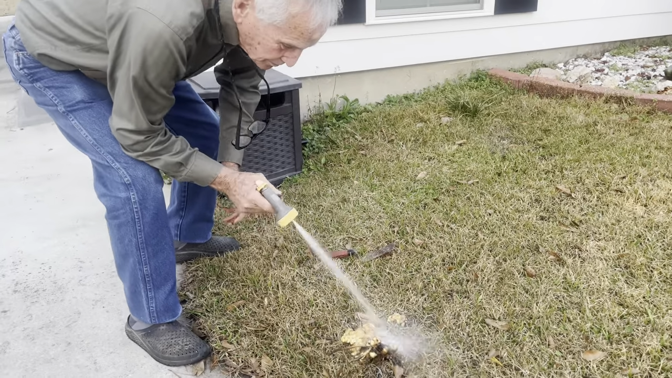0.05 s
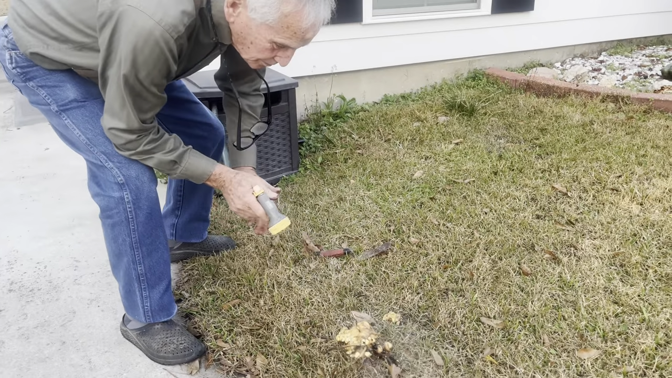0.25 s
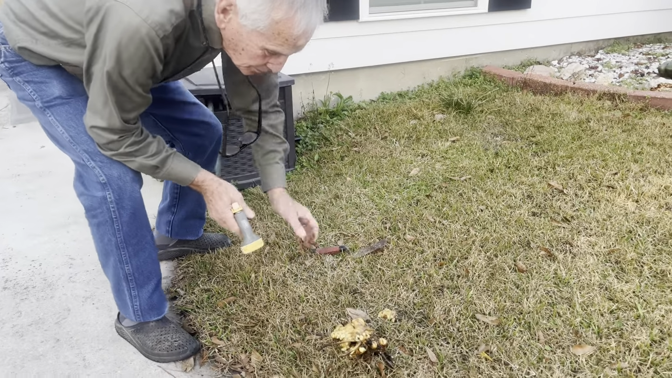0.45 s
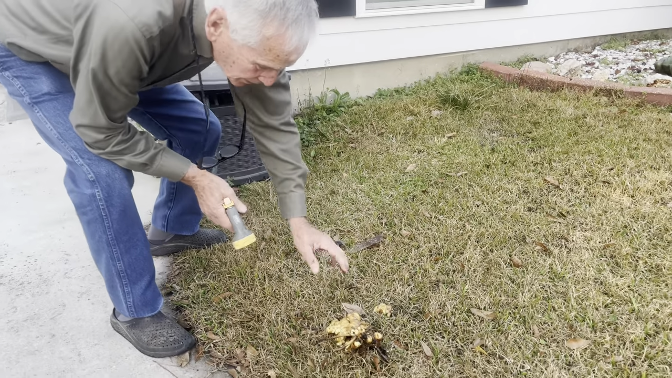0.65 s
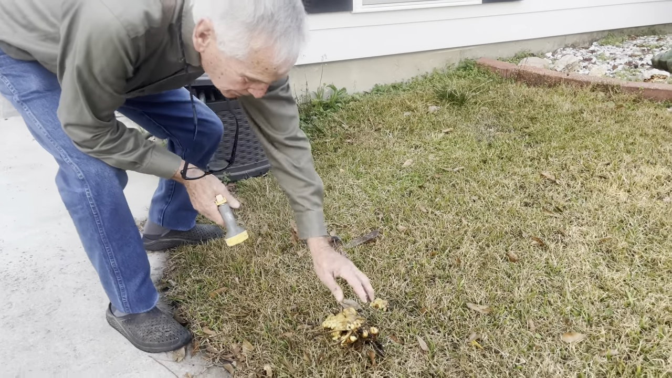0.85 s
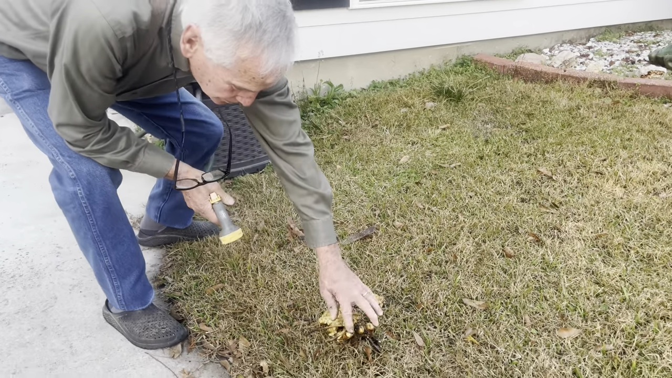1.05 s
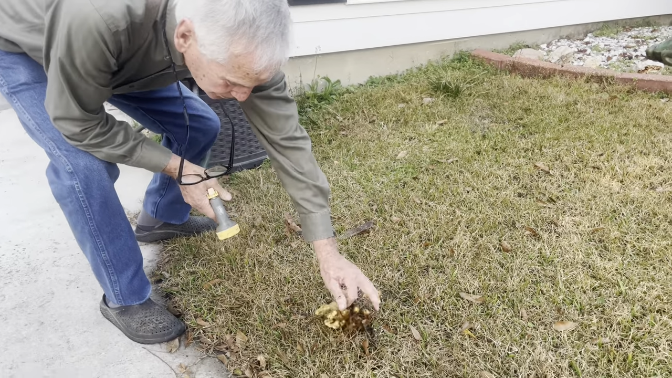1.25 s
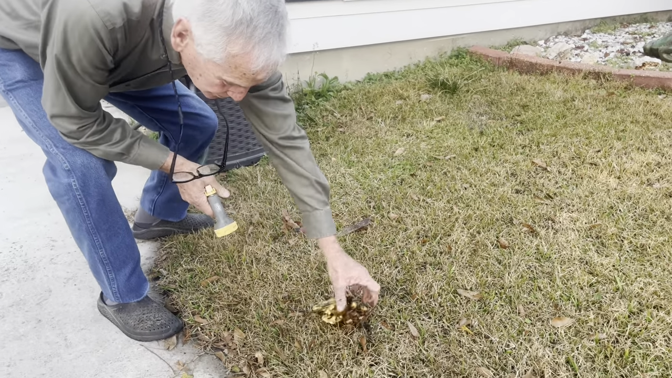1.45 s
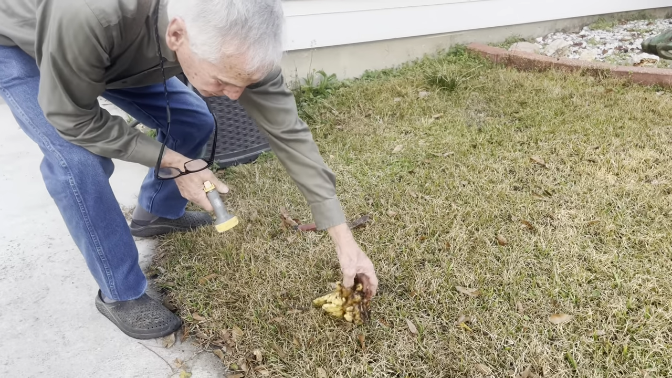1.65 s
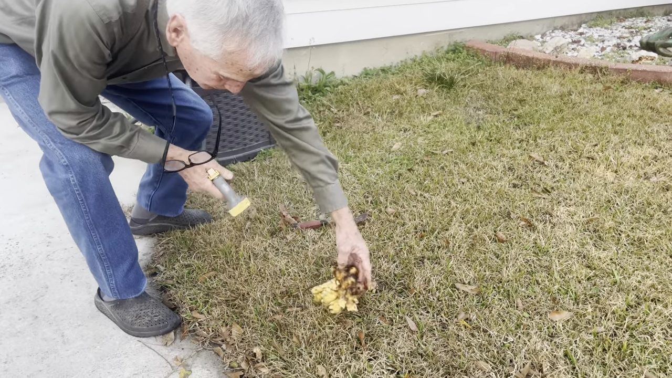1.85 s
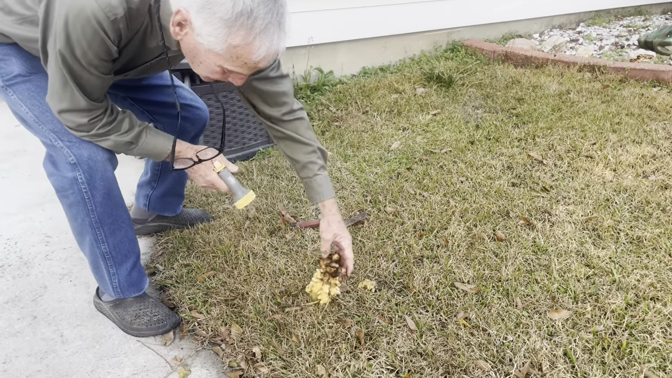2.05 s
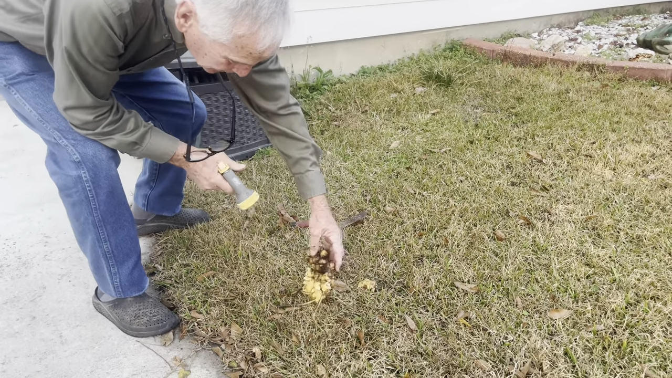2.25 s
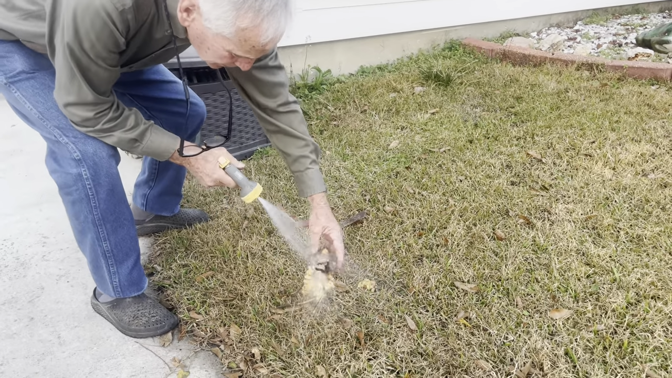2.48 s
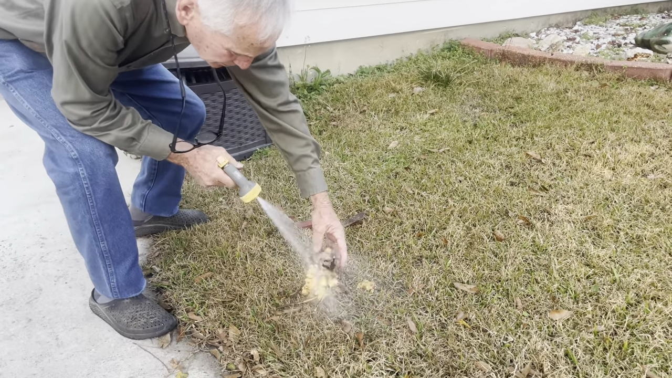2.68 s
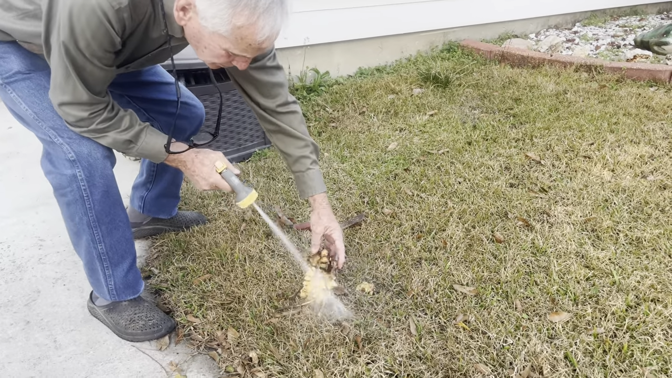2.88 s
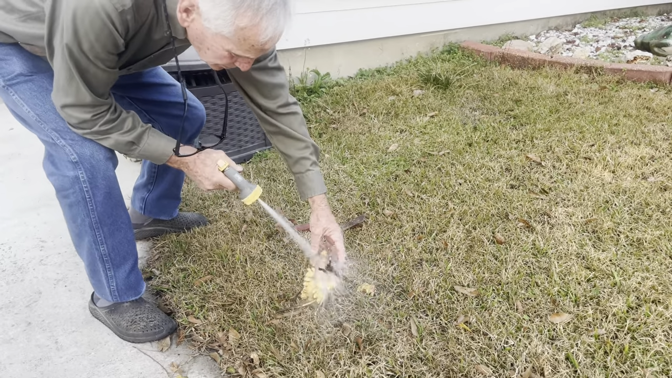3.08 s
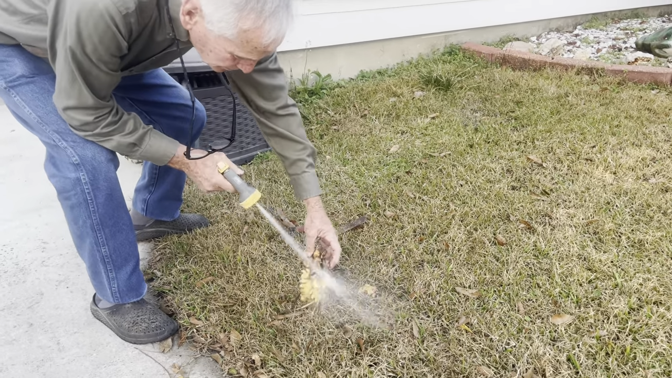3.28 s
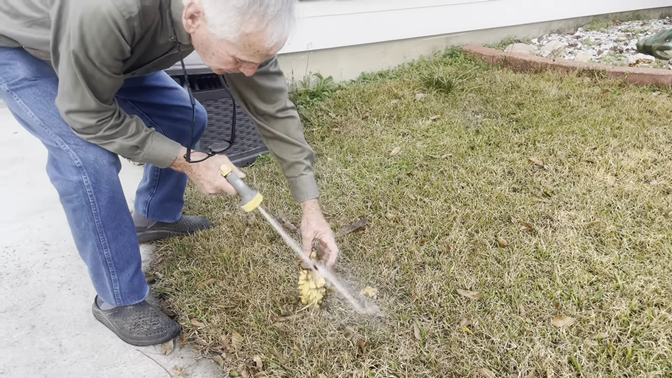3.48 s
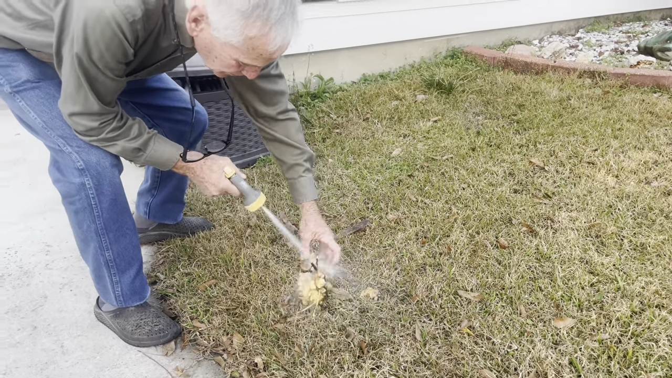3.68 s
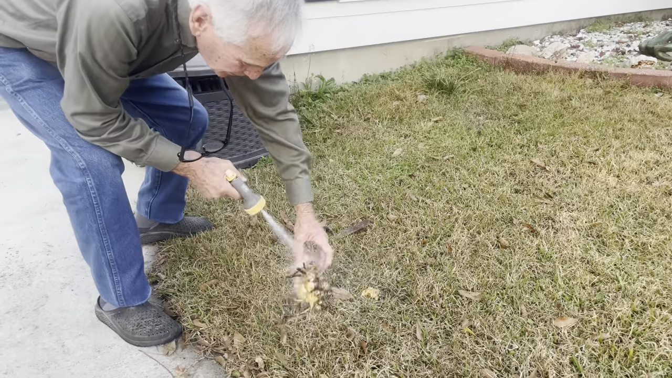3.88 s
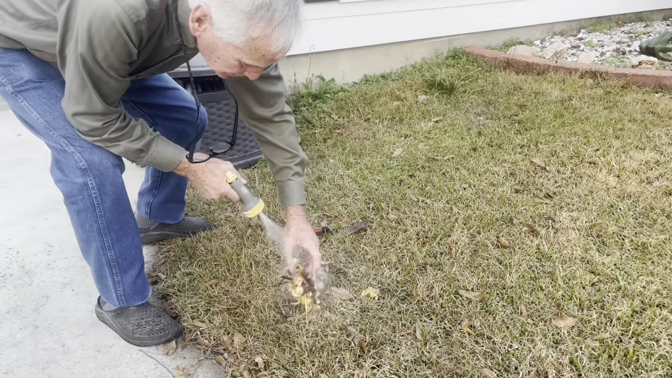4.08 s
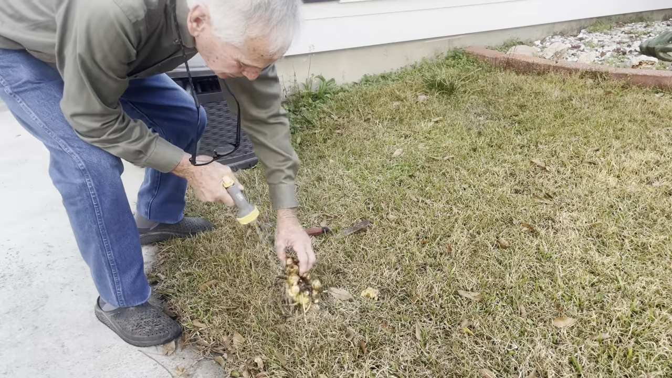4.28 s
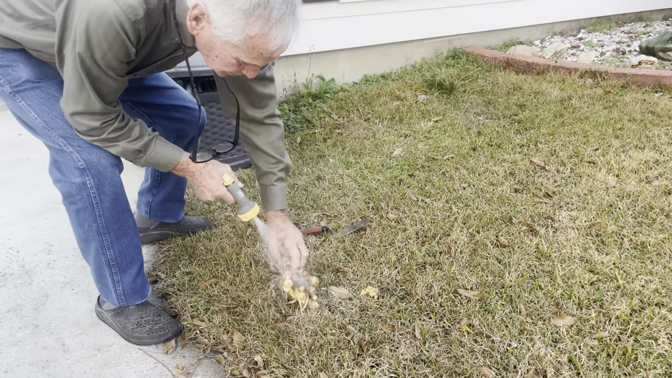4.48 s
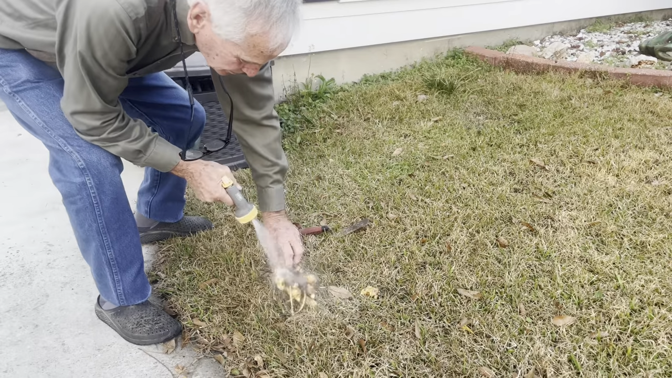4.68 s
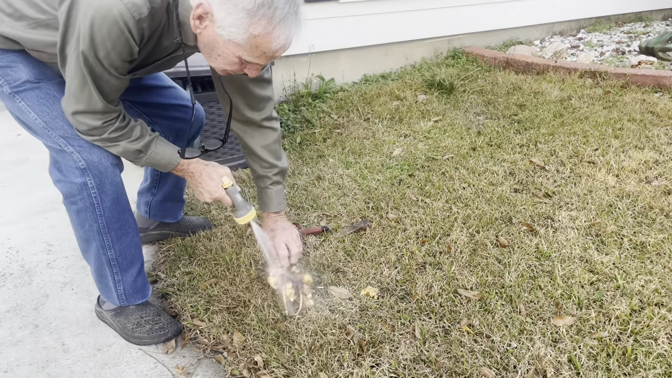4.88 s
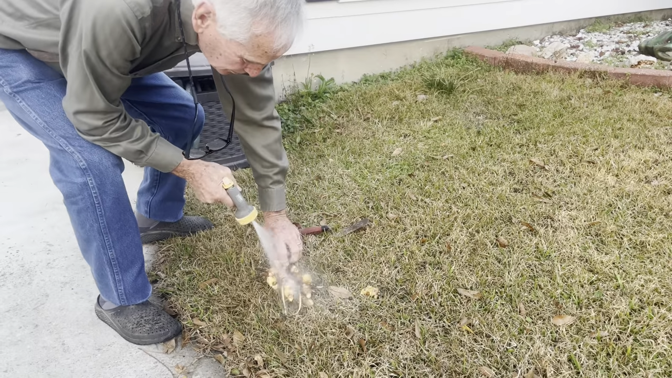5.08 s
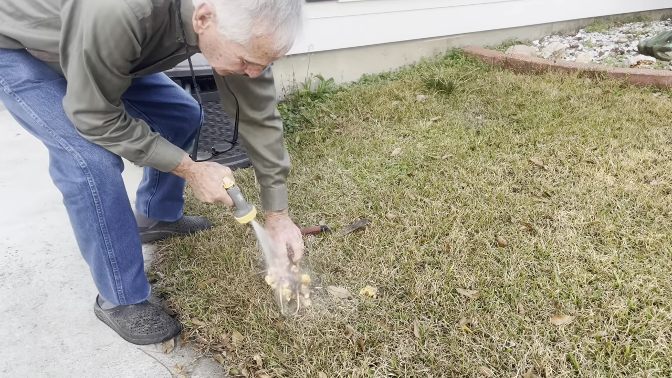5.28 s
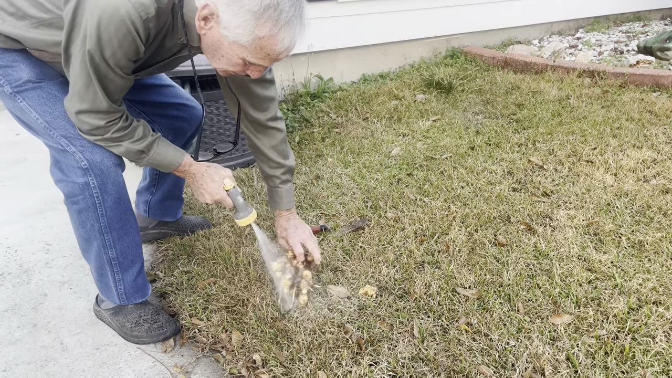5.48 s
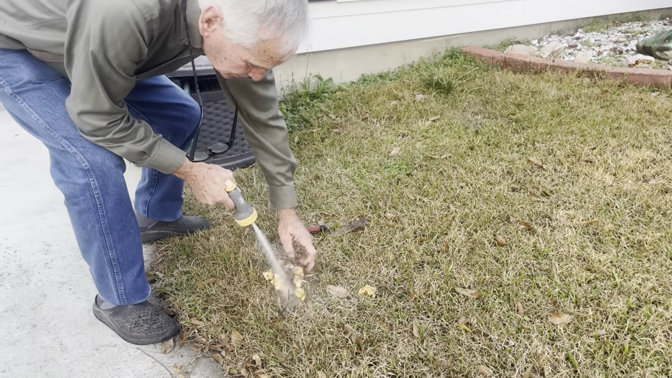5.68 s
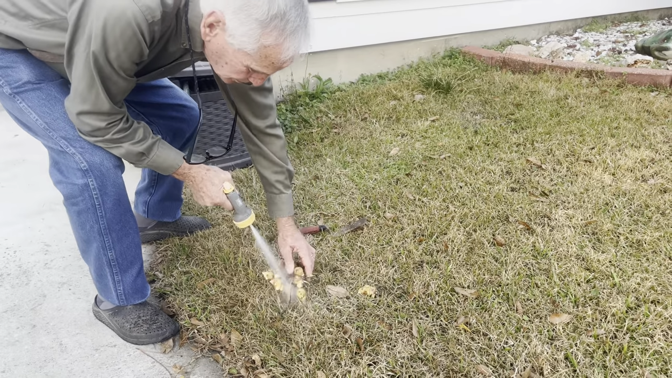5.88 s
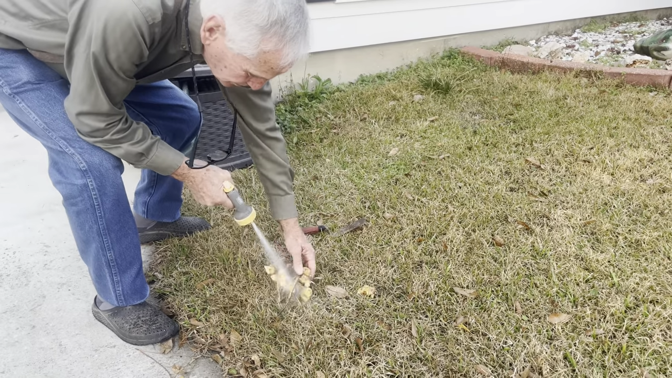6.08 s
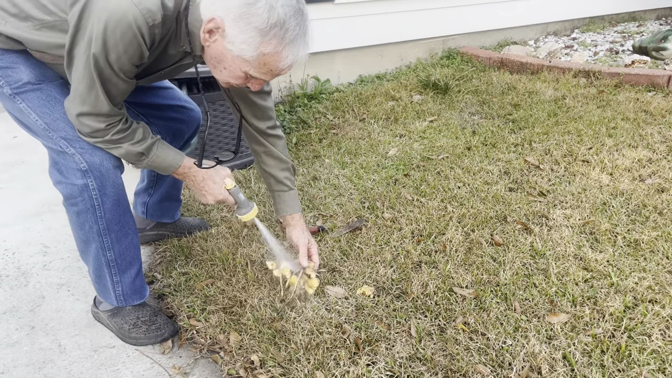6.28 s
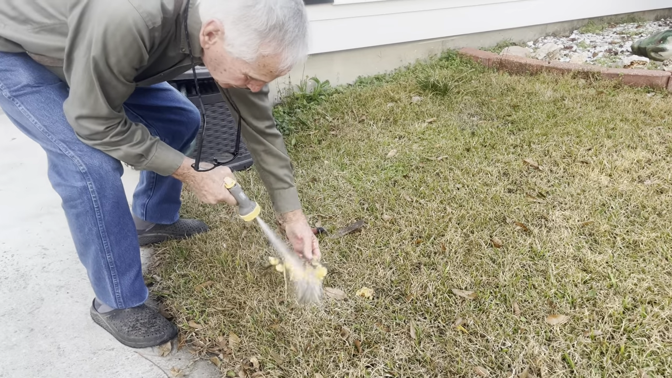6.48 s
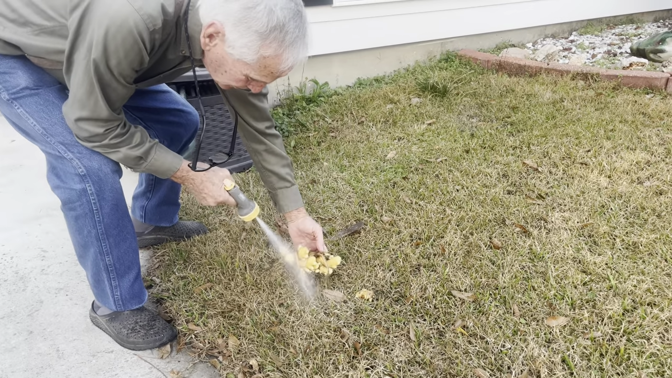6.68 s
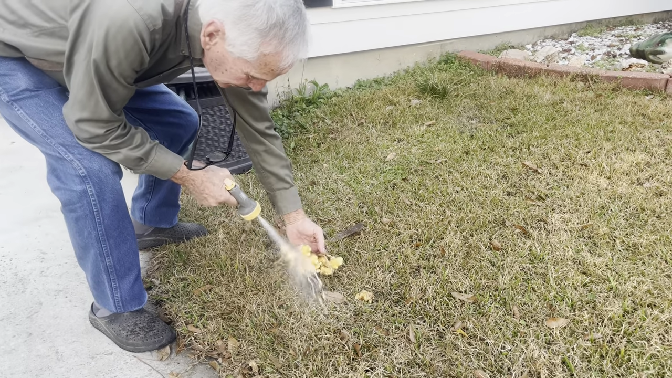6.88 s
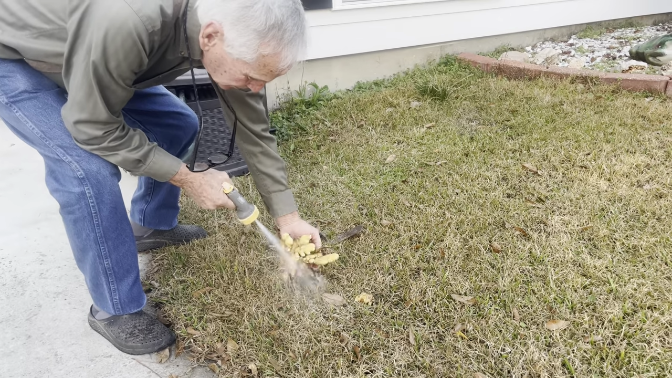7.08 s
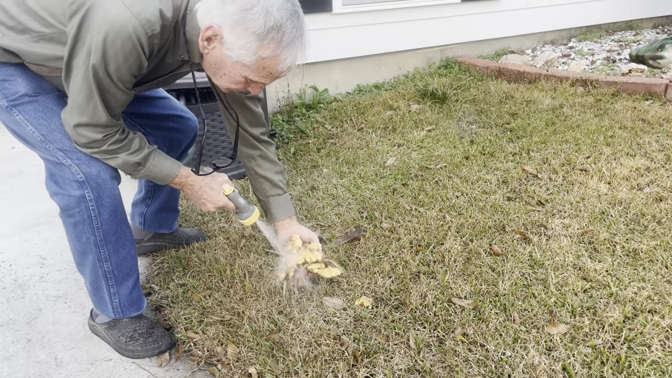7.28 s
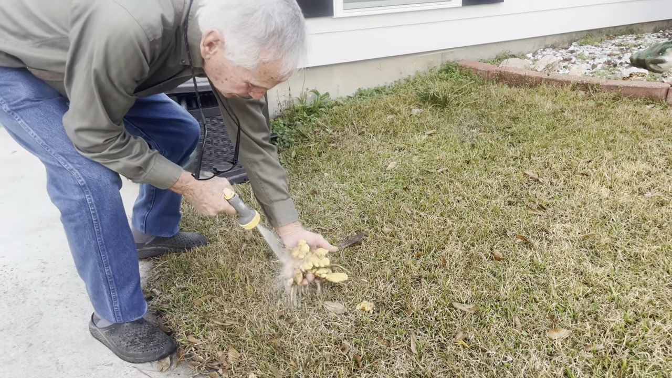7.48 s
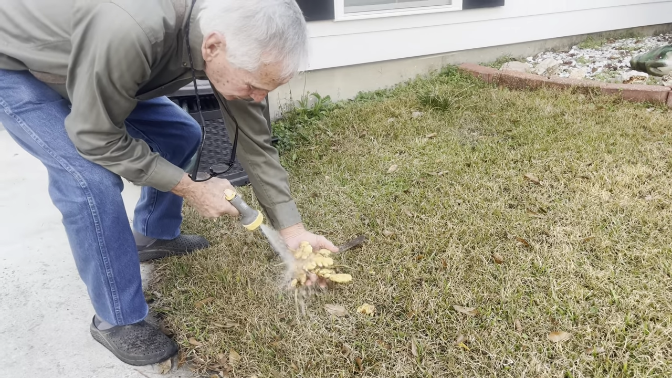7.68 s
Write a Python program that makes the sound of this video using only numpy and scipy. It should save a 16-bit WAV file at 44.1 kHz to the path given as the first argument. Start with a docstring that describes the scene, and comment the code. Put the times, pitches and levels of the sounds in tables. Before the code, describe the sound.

Outdoors on a lawn, a phone microphone a couple of metres off picks up a short splash of hose water over a low, distant traffic rumble. In the pause come faint insect ticks and light crackles of a hand in the grass. Then the nozzle opens again with a sputtering hiss, eases off once and resumes with wetter smacks on roots and hand. Low knocks bump the microphone stand now and then.

```python
"""Garden nozzle on roots

A nozzle opens in three spells onto roots on a lawn, a couple of metres from a phone with two ports.
The jet hisses, drops splatter on roots and hand, near surfaces colour both. Distant traffic rumbles,
an insect ticks on the left, a hand rustles in the grass and knocks run through the phone's stand."""
import sys
import numpy as np
from scipy import signal
from scipy.fft import rfft, irfft, next_fast_len
from scipy.io import wavfile
from scipy.ndimage import uniform_filter1d

SR = 44100
rng = np.random.default_rng(int(sys.argv[2]) if len(sys.argv) > 2 else 0)


def store_pcm(level_fs):
    """Save levels as 16-bit WAV."""
    pcm = np.round(np.clip(level_fs, -1, 1) * 32767).astype(np.int16)
    wavfile.write(sys.argv[1], SR, np.atleast_2d(pcm).T)


N = 341334
FFT_SIZE = 64 * next_fast_len(N // 64 + 128)
FREQ_HZ = np.maximum(np.arange(FFT_SIZE // 2 + 1) * SR / FFT_SIZE, 1)
TIME_S = np.arange(N) / SR

# Spraying, one table a spell: time_s, hiss_db, splatter_db
SPELLS = [
    [(0.0, -38.5, -32.5), (0.08, -36.5, -31), (0.1, -31.5, -21), (0.15, -32, -24), (0.22, -37, -35),
     (0.266, -38, -31), (0.304, -58, -64), (0.36, -72, -62)],
    [(2.3, -86, -60), (2.325, -61, -51), (2.418, -43, -35), (2.422, -28.5, -27.5), (2.46, -31, -30),
     (2.76, -33, -31.5), (2.96, -28.5, -29.5), (3.02, -30.5, -32), (3.15, -28, -30), (3.29, -33.5, -32.5),
     (3.44, -30.5, -28), (3.54, -33, -30), (3.62, -27, -30.5), (3.77, -28.5, -31), (4.03, -34.5, -31),
     (4.13, -44.5, -40.5), (4.23, -48.5, -40), (4.3, -59, -43), (4.43, -58, -45)],
    [(4.45, -53, -43), (4.465, -41.5, -39), (4.73, -36.5, -34), (4.785, -32, -31), (4.9, -32.5, -26),
     (4.94, -32.5, -30.5), (5.14, -33, -29.5), (5.2, -30, -23.5), (5.25, -32, -30), (5.4, -32, -30),
     (5.46, -30, -21), (5.68, -33.5, -25), (5.72, -32, -25), (5.98, -34, -25), (6.04, -31.5, -29),
     (6.2, -34, -30.5), (6.5, -34, -31.5), (6.61, -34, -25), (6.68, -32, -31.5), (6.9, -31.5, -31),
     (7.04, -33, -30), (7.14, -34, -30.5), (7.17, -31.5, -28.5), (7.33, -33.5, -29.5), (7.46, -32.5, -34.5),
     (7.58, -37, -35), (7.74, -37, -36.5)],
]
# Bands favoured by near surfaces and phone body; the jet lands elsewhere in each spell:
# centre_hz, width_hz, spell0_db, spell1_db, spell2_db
SURFACE_BANDS = [(450, 720, -9, -13.5, -17.5), (823, 53, -8, -5, -5), (1108, 226, 2.5, 2, 2),
                 (1785, 750, 5.5, 5.5, 4.5), (2248, 420, 3.5, 1, 3), (3070, 290, -23, -4, -0.5),
                 (3743, 610, 10.5, 8.5, 7), (4480, 400, 6, -8, -4.5), (4950, 265, 6.5, 4, 4.5),
                 (5600, 230, -1, 2, 4), (6105, 350, 0.5, 4.5, 4.5), (6700, 370, -0.5, 0.5, 3),
                 (7440, 590, -9, -6.5, -9), (8430, 600, -11, -8.5, -11.5), (9320, 1000, -15.5, -10.5, -10),
                 (10300, 1140, -16, -10, -10), (11010, 670, -12, -12.5, -12), (13500, 1800, -36, -30, -30)]
# Left port, facing away from the jet: freq_hz, gain_db, lag_rad, coherence
LEFT_SHADE = [(640, 0, 1, .3), (1100, 0, .5, .75), (1550, -1, .2, .7), (1900, -1.5, .5, .9),
              (2240, -4.5, .4, .95), (2600, -7, 2.3, .6), (2930, 0, .2, .65), (3300, 6, .3, .6),
              (3650, 4.5, .5, .95), (3980, 0, 0, .9), (4300, 2, 2.4, .2), (4650, 3, 2.4, .5),
              (5050, 0, 2.2, .75), (5340, -1, 0, .3), (5700, -1, .5, .5), (6050, -1, .7, .9),
              (6400, 0, .8, .7), (6750, -1, .6, .9), (7060, -2, 0, .45), (7420, -1.5, -.8, .75),
              (7800, -3, -1, .4), (8050, -9, -3.6, .3), (8450, -7.5, -2.2, .7), (9100, -13, -1, .4),
              (9500, -16, -2, .6), (10200, -20, 1, .45), (11200, -31, 3, .15), (12100, -18, 3, .1),
              (12600, 6, 3, .1)]
# Fine drops brighten, brief splashes and one long late swell: centre_s, boost_db, width_s
FINE_SWELLS = [(3.564, 2, 0.026), (3.97, 8, 0.016), (4.844, 6, 0.036), (6.44, 9, 0.037), (6.65, 4.5, 0.84)]
# Traffic bass spectrum: freq_hz, relative_db
BASS_SPECTRUM = [(13, -52), (22, -22), (34, -24), (52, -1.5), (87, -1), (117, -6.5), (144, -1), (177, -11),
                 (400, -35), (520, -65), (880, -120)]
# Traffic bass swell: time_s, level_db
BASS_SWELL = [(0.0, -27.5), (2.2, -27), (2.7, -27.5), (3.2, -28), (5.3, -28), (6.8, -29), (7.74, -29)]
# Tyre hiss spectrum: freq_hz, relative_db
TYRE_SPECTRUM = [(180, -37), (300, -10.5), (441, -15), (793, -4.5), (1020, -1.5), (1200, -5.5),
                 (1400, -4.5), (2030, -15), (2200, -17.5), (2410, -23.5), (2950, -29.5), (3450, -27),
                 (3900, -34), (4470, -36.5), (6780, -31.5), (12000, -63.5), (15600, -77), (22000, -120)]
# Tyre hiss swell: time_s, gain_db
TYRE_SWELL = [(0.0, 3), (0.6, 1.5), (1.4, 0.5), (2.3, 0), (4.3, -1.5), (6.0, 1), (7.74, -1)]
# Traffic across the ports: freq_hz, left_minus_right_db, coherence
TRAFFIC_SIDES = [(62.4, -0.7, 0.98), (204, 6.5, 0.88), (557, -3, 0), (1340, 1.5, 0.71), (2180, 1.5, 0.16),
                 (5850, 6, 0), (8100, 2.5, 0.4), (10800, -25, 0.4)]
# Gulps hitting hand and roots: start_s, strength_db
SMACKS = [(0.094, -10), (0.125, -8), (0.144, -12), (4.8589, -15), (4.908, -13), (5.166, -23), (5.188, -12),
          (5.201, -15), (5.211, -16), (5.223, -12), (5.4243, -9), (5.441, -7), (5.4618, -12), (5.475, -14),
          (5.499, -8), (5.509, -6), (5.514, -5.5), (5.526, -8), (5.532, -6), (5.5647, -12), (5.5924, -7),
          (5.6, -13), (5.617, -9), (5.65, -13), (5.689, -12), (5.7087, -8), (5.718, -10), (5.755, -19),
          (5.7703, -15), (5.9234, -21), (6.0823, -16), (6.1694, -19), (6.2575, -15), (6.4053, -20),
          (6.5375, -16), (6.5819, -15), (6.6134, -11), (6.628, -18), (7.1152, -18), (7.1586, -19),
          (7.195, -15), (7.28, -17), (7.1759, -10)]
# Loudest grass crackles: start_s, strength_db, left_minus_right_db
CRACKLES = [(0.7537, -43, -5), (1.1682, -38, -1.5), (1.185, -28, 1), (1.2144, -45, 4), (1.2374, -41, 2.0),
            (1.294, -44, 0), (1.365, -47, 0), (1.508, -45, 0), (1.5224, -43, -3), (1.535, -43, 0),
            (1.5753, -42, 4), (1.6304, -40, 0.0), (1.652, -44, 0), (1.6734, -42, 5.5), (1.8003, -41, 0),
            (2.016, -43, 0), (2.135, -47, 0)]
# Hand strokes through grass: centre_s, width_s, strength_db, centre_hz, width_hz
BRUSHES = [(0.78, .04, -66, 7000, 6000), (1.24, .05, -49, 6000, 4000), (1.6, .13, -50, 2200, 400)]
# Knocks in the stand: crest_s, peak_db, fullest_age_s, log_spread, ripple_db, ripple_hz
KNOCKS = [(2.182, -17, .014, 0.4, -32, 490), (2.8737, -4.5, 0.01, 0.29, -22, 475),
          (3.587, -5.5, .013, 0.33, -28.5, 480), (4.1005, -20, 0.011, 0.29, -44, 500),
          (5.897, -15.5, 0.013, 0.32, -40, 503), (6.915, -3.5, 0.015, 0.44, -28, 520),
          (7.2864, -9.5, 0.022, 0.39, -26, 487), (7.323, -21, .011, 0.46, -32, 450),
          (7.386, -2.5, 0.014, 0.4, -23.5, 554)]
# Nozzle spits: start_s, strength_db
SPITS = [(2.4198, -5), (2.5292, -13), (2.6179, -14), (3.3114, -20), (3.5094, -10), (3.5937, -11.5),
         (3.966, -9), (4.122, -25), (4.206, -21), (4.221, -26), (4.275, -31), (4.458, -25.5), (4.475, -26),
         (4.486, -20), (4.7805, -12), (4.9482, -15), (5.238, -14), (5.3398, -14), (5.9429, -19),
         (6.0077, -19), (6.3949, -13), (7.125, -16), (7.3218, -15), (7.6675, -18)]

SLAP_HZ, SPLATTER_HZ, FINE_HZ, HISS_HZ, MIST_HZ = 284, 1380, 2750, 4250, 7900  # lower band edges
FULL_HISS_DB, FULL_SPLATTER_DB = -32, -30
TREBLE_BROADENING, BAND_STRETCH, SWAY_SHARE = (1.77, 1.06, 0.99), (1, 0.98, 0.97), (0, .4, 1)  # by spell


def undb(db):
    """dB to gain."""
    return 10 ** (np.asarray(db) / 20)


def unit(x):
    """Scale to rms 1."""
    return x / np.sqrt(np.mean(x ** 2))


def noise(samples=N):
    """Two unrelated white noises."""
    return rng.standard_normal((2, samples))


def along_hz(table):
    """Table columns interpolated over log frequency."""
    hz, *columns = np.transpose(table)
    return [np.interp(np.log(FREQ_HZ), np.log(hz), column) for column in columns]


def shape(x, response):
    """Filter by a frequency response."""
    return irfft(rfft(x, FFT_SIZE) * response, FFT_SIZE)[..., :N]


def causal(gain):
    """Minimum-phase response: rings only after the blow."""
    cepstrum = irfft(np.log(gain[::32] + 1e-6))
    cepstrum[1:len(cepstrum) // 2] *= 2
    cepstrum[len(cepstrum) // 2 + 1:] = 0
    return rfft(irfft(np.exp(rfft(cepstrum))), FFT_SIZE)


def under(hz):
    """Steep low-pass gain."""
    return 1 / np.sqrt(1 + (FREQ_HZ / hz) ** 24)


def resonance(centre_hz, width_hz, stretch=1):
    """Bell-shaped gain; stretch scales the frequency axis."""
    return 1 / (1 + (2 * (FREQ_HZ / stretch - centre_hz) / width_hz) ** 2)


def bump(centre_s, width_s):
    """Gaussian envelope."""
    return np.exp(-((TIME_S - centre_s) / width_s) ** 2)


def walk(rate_hz):
    """Smoothed random steps, rms 1."""
    hold = int(SR / rate_hz)
    steps = np.repeat(rng.standard_normal(N // hold + 1), hold)
    return unit(uniform_filter1d(uniform_filter1d(steps, hold), hold)[:N])


def bursts(events, decay_s):
    """Envelope of decaying bursts."""
    marks = np.zeros(N)
    for start_s, db in events:
        marks[int(start_s * SR)] = undb(db)
    return signal.lfilter([1], [1, -np.exp(-1 / (decay_s * SR))], marks)


def ports(right, unrelated, gain_db, lag_rad, coherence):
    """Stereo pair: left is part the right's sound, shaded and shifted, part unrelated."""
    gain_db, lag_rad, coherence = (uniform_filter1d(uniform_filter1d(curve, 600), 600)
                                   for curve in (gain_db, lag_rad, np.clip(coherence, 0, .96)))
    shared = shape(right, undb(gain_db) * coherence * np.exp(-1j * lag_rad))
    apart = shape(unrelated, undb(gain_db) * np.sqrt(1 - coherence ** 2))
    return np.array([shared + apart, right])


def surface_gain(spell, stretch=1):
    """Colour of near surfaces and phone body in one spell."""
    power = 0
    for hz, width_hz, *spell_db in SURFACE_BANDS:
        width_hz *= TREBLE_BROADENING[spell] if hz > HISS_HZ else 1
        power += (undb(spell_db[spell]) * resonance(hz, width_hz, BAND_STRETCH[spell] * stretch)) ** 2
    return np.sqrt(power)


def drops(rate_hz, spread_db, mist_db, surge_db):
    """Two showers surging together: uneven lone impacts in a mist of tiny ones."""
    hits = rng.random((2, N)) < rate_hz / SR
    sizes = undb(spread_db * np.minimum(rng.exponential(size=(2, N)), 4.5)) * np.sign(noise())
    return (unit(hits * sizes) + undb(mist_db) * noise()) * undb(surge_db)


def jet(colour):
    """Sputtering jet and its impacts: five bands of drop noise, heavy to tiny."""
    time_s, *columns = np.concatenate(SPELLS).T
    hiss_db, splatter_db = (np.interp(TIME_S, time_s, column) for column in columns)
    force_db = hiss_db - FULL_HISS_DB
    direct_db = splatter_db - FULL_SPLATTER_DB - force_db  # how squarely the jet hits
    slap_db = splatter_db - 6.5 + 0.29 * (splatter_db + 25.5)  # only a full hit sounds deep
    mist_db = hiss_db + 4 - 0.25 * np.maximum(force_db, -8) - 0.07 * direct_db + 0.5 * walk(27)
    fine_db = hiss_db - 9 + 0.28 * direct_db + 0.17 * force_db + 0.5 * walk(17)
    fine_db += sum(db * bump(centre_s, width_s) for centre_s, db, width_s in FINE_SWELLS)
    sputter_db = .3 * walk(18) + .9 * walk(60)
    lumpiness = np.clip(0.77 + 0.017 * (splatter_db - hiss_db), .3, 2)  # a direct hit breaks into gulps
    gulp_db = 0.99 * sputter_db + 0.97 * lumpiness * walk(200) + 0.38 * walk(12)
    heavy = drops(rate_hz=1200, spread_db=4.25, mist_db=1.4, surge_db=gulp_db)
    fine = drops(rate_hz=5000, spread_db=5.5, mist_db=0.84, surge_db=sputter_db + 1.5 * walk(40))
    tiny = drops(rate_hz=9000, spread_db=7, mist_db=1, surge_db=sputter_db + 0.58 * walk(30))
    edges = [under(hz) for hz in (SLAP_HZ, SPLATTER_HZ, FINE_HZ, HISS_HZ, MIST_HZ)] + [1]
    bands = [top * np.sqrt(1 - bottom ** 2) for bottom, top in zip(edges, edges[1:])]
    layers = (heavy, slap_db), (heavy, splatter_db), (fine, fine_db), (tiny, hiss_db), (tiny, mist_db)
    return sum(unit(shape(shower, causal(colour * band))) * undb(db)
               for (shower, db), band in zip(layers, bands))


def aim(water, colour):
    """Recolour the jet per spell; hand and jet sway, fading in slightly higher bands."""
    spell = np.searchsorted([rows[0][0] for rows in SPELLS], TIME_S, side='right') - 1
    aimed = sum(shape(water * (spell == k), causal(surface_gain(k) / colour)) for k in range(2))
    aimed += water * (spell == 2)
    sway = (.5 + .5 * np.tanh(walk(5))) * np.take(SWAY_SHARE, spell)
    raised = shape(aimed, causal(surface_gain(2, stretch=1.035) / colour))
    return (1 - sway) * aimed + sway * raised


def traffic(tyre_db=-35, lag_s=0.0003):
    """Far traffic: throbbing bass under smoother tyre hiss, reaching the right port first."""
    low = under(305)
    bass = shape(noise(), undb(along_hz(BASS_SPECTRUM)[0]) * low)
    bass += shape(bass, under(74.4)) * (undb(5 * bump(7.43, 0.25)) - 1)  # late deep swell
    tyres = shape(noise(), undb(along_hz(TYRE_SPECTRUM)[0]) * np.sqrt(1 - low ** 2))
    bass_db = np.interp(TIME_S, *np.transpose(BASS_SWELL)) + 0.72 * walk(20)
    drift_db = np.interp(TIME_S, *np.transpose(TYRE_SWELL)) + .6 * walk(2) + .5 * walk(25)
    far = unit(bass) * undb(bass_db) + unit(tyres) * undb(tyre_db + drift_db)
    side_db, coherence = along_hz(TRAFFIC_SIDES)
    return shape(ports(*far, side_db, 2 * np.pi * FREQ_HZ * lag_s, coherence), undb(-side_db / 2))


def smacks(colour, top_hz=2450):
    """Single gulps of water hit hand and roots: dull noise bursts."""
    envelope = uniform_filter1d(bursts(SMACKS, decay_s=0.0026), 60)
    return shape(noise() * envelope, undb(5) * causal(colour * under(top_hz)))


def insect(offset_s=.4365, period_s=.16676, decay_s=.004):
    """Steady train of scratchy ticks, mostly at the left port."""
    age_s = (TIME_S - offset_s) % period_s
    ticks = np.exp(-age_s / decay_s) * rng.standard_normal(N)
    return undb([[-37], [-46]]) * shape(ticks, causal(resonance(centre_hz=6170, width_hz=2600) ** 2))


def crackles(faint_count=14, faint_span_s=(.5, 2.3)):
    """Dry grass and soil under the hand: clear crackles among faint random ones."""
    out, age_s = np.zeros((2, N + SR)), np.arange(SR // 20) / SR
    faint = [(rng.uniform(*faint_span_s), rng.normal(-54, 3), rng.normal(0, 3))
             for _ in range(faint_count)]
    envelope = np.exp(-age_s / 0.0012) * (1 - np.exp(-age_s / 0.0005)) + 0.17 * np.exp(-age_s / 0.033)
    for start_s, db, pan_db in faint + CRACKLES:
        at = int(start_s * SR)
        gains = undb([[db + pan_db / 2], [db - pan_db / 2]])
        out[:, at:at + len(age_s)] += gains * noise(len(age_s)) * envelope
    colour = 1 / (1 + ((FREQ_HZ - 8000) / 3500) ** 4) + undb(12) * resonance(2000, 800)
    shade = undb(np.minimum(along_hz(LEFT_SHADE)[0], 0))  # left port loses treble
    return shape(out[:, :N], causal(colour) * np.array([shade, np.ones_like(shade)]))


def brushes():
    """Hand brushing through grass: fluttering swells of band noise."""
    return sum(shape(noise() * undb(db + 3.4 * walk(60)) * bump(at_s, width_s), resonance(hz, width_hz))
               for at_s, width_s, db, hz, width_hz in BRUSHES)


def knocks(crest_age_s=0.012, ripple_lead_s=.0085, ripple_width_s=.0025, sag_per_s=45):
    """Bending waves in the stand: highs run ahead, pitch falls as 1 / age; right is earlier, brighter."""
    out, age_s = np.zeros((2, N + SR)), np.arange(1, SR // 12) / SR
    bend_rad = 2 * np.pi * 1.8 * np.log(age_s / crest_age_s)
    ripple_s = np.arange(-SR // 100, SR // 100) / SR
    ripple_envelope = np.exp(-.5 * (ripple_s / ripple_width_s) ** 2)
    for crest_s, db, fullest_s, spread, ripple_db, ripple_hz in KNOCKS:
        left, right = (np.exp(-.5 * (np.log(age_s / peak_s) / spread) ** 2)
                       for peak_s in (fullest_s, 0.8 * fullest_s))
        wave = np.array([left * np.cos(bend_rad), undb(-3) * right * np.cos(bend_rad - 2.3)])
        at = int((crest_s - crest_age_s) * SR)
        out[:, at:at + len(age_s)] += undb(db) * wave
        ripple_rad = 2 * np.pi * ripple_hz * ripple_s * (1 - sag_per_s * ripple_s / 2)
        ripple = ripple_envelope * np.cos([ripple_rad, ripple_rad - 1.2])
        at = int((crest_s - ripple_lead_s + ripple_s[0]) * SR)
        out[:, at:at + len(ripple_s)] += undb(ripple_db) * ripple
    return shape(out[:, :N], under(1000))


def spits(colour):
    """Air and water spit from the nozzle: short bright bursts."""
    bright = colour ** 0.89 * (1 - under(FINE_HZ)) * FREQ_HZ / HISS_HZ
    return shape(noise() * bursts(SPITS, decay_s=.0009), causal(bright))


def scene():
    """All sources at the two ports."""
    colour = surface_gain(2)
    shut = (TIME_S > SPELLS[0][-1][0]) & (TIME_S < SPELLS[1][0][0])
    water = aim(jet(colour), colour) * ~shut + smacks(colour) + spits(colour)
    return ports(*water, *along_hz(LEFT_SHADE)) + knocks() + crackles() + brushes() + insect() + traffic()


def record(dry, top_hz=12100, stop_hz=14400):
    """Phone roll-off: steep above its band, a trace of air let through."""
    band = signal.sosfilt(signal.ellip(7, .3, 22, top_hz, fs=SR, output="sos"), dry)
    return signal.sosfilt(signal.ellip(8, .2, 60, stop_hz, fs=SR, output="sos"), band)


dry = scene()
out = record(dry)
store_pcm(out)
```